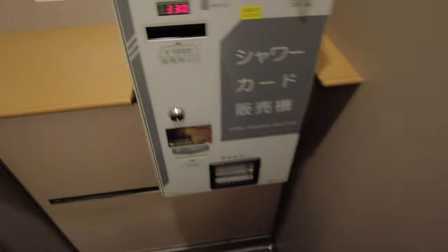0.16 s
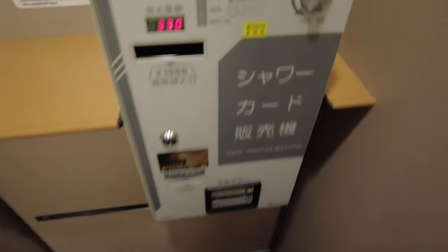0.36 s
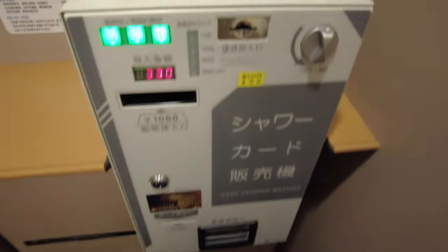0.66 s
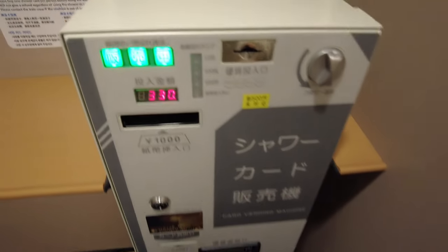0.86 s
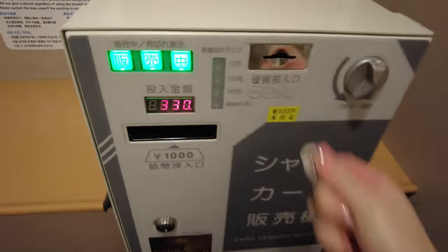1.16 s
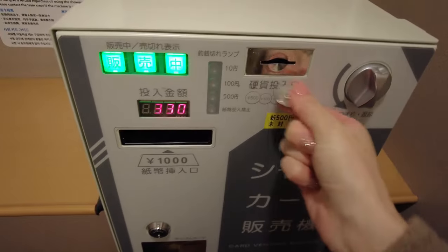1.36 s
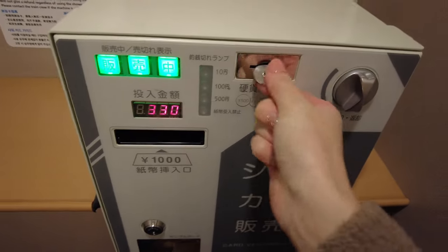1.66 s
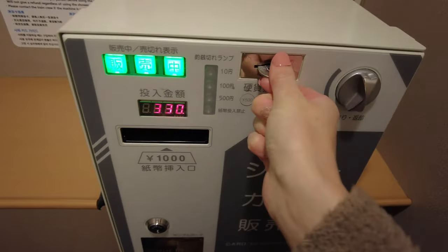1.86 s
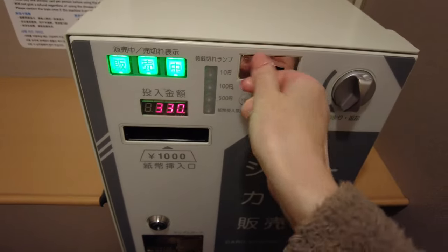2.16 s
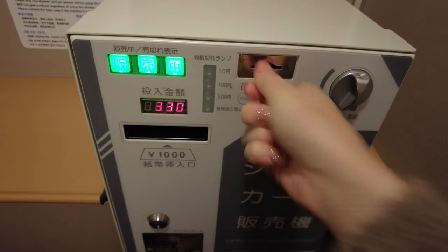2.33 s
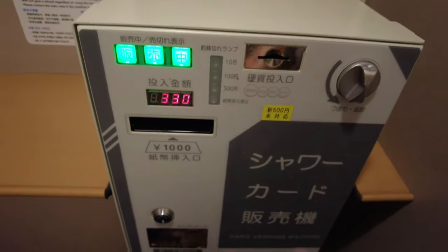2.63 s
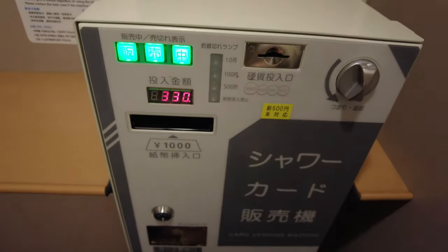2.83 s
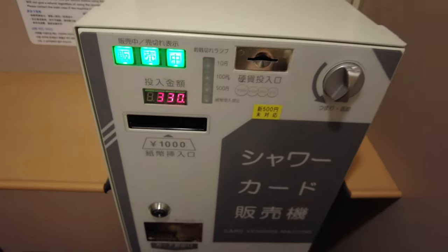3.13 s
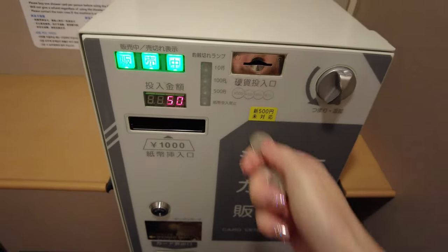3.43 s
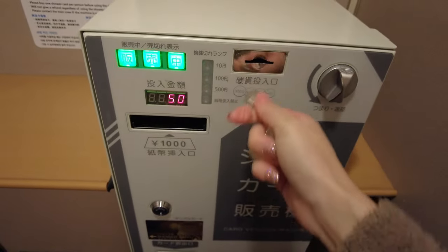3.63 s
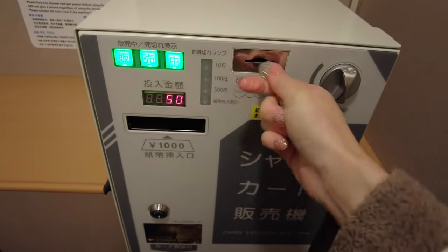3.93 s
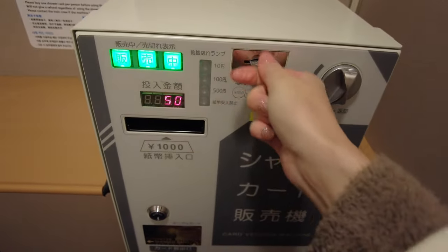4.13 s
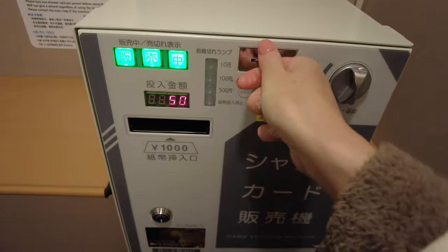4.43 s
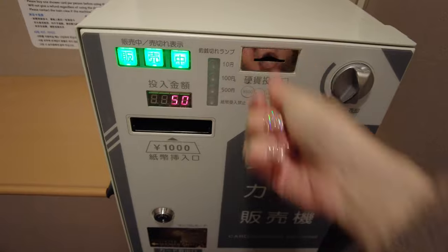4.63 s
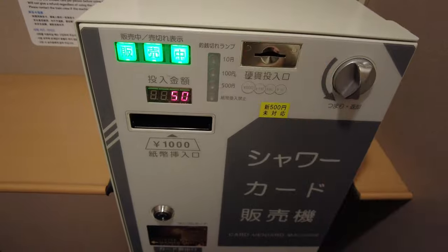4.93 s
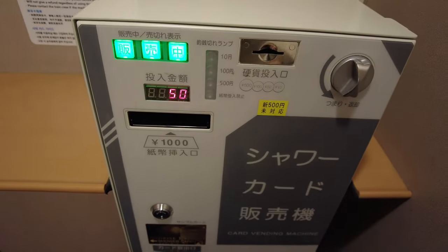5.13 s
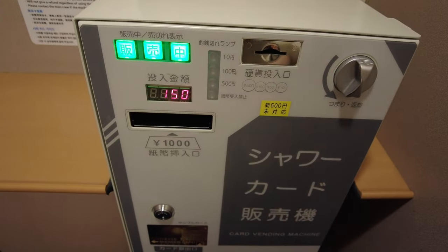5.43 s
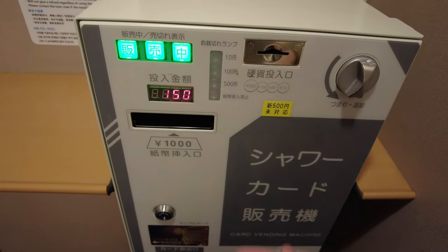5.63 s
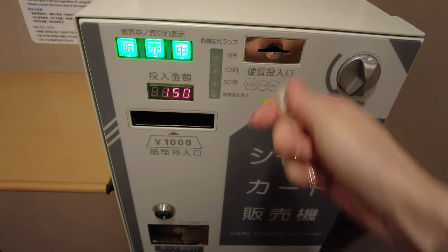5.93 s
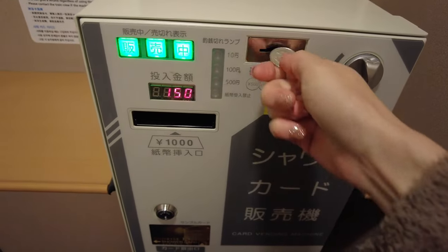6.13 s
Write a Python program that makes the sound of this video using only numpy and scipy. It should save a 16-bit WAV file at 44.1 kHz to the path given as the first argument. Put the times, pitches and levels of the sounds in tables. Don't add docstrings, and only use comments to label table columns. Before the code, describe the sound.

Coins tick into the metal slot of a vending machine, ring briefly and rattle down inside, over a train carriage's steady low rumble.

```python
import sys
import numpy as np
from scipy import signal
from scipy.fft import rfft, irfft
from scipy.io import wavfile
from scipy.ndimage import uniform_filter1d

SR = 44100
rng = np.random.default_rng(int(sys.argv[2]) if len(sys.argv) > 2 else 0)


def gain_from_db(level_db):
    decades = np.asarray(level_db, float) / 20
    return 10 ** decades


def pcm_store(signal):
    levels = np.round(np.clip(np.atleast_2d(signal), -1, 1) * 32767)
    wavfile.write(sys.argv[1], SR, levels.astype(np.int16).T)


N = 277389


def evened(x):
    return x / np.sqrt(np.mean(x ** 2) + 1e-20)


def read(points, hz):
    f, value = np.transpose(points)
    return np.interp(np.log(hz + 1), np.log(f + 1), value)


def curve(rows):
    start_s, level_db = np.transpose(rows)
    return np.interp(np.arange(N) / SR, start_s, level_db)


def bumps(hz, modes):
    return sum(db / (1 + (2 * (hz - f) / w) ** 2) for f, w, db in modes)


def add(mix, start_s, sound):
    part = mix[:, round(start_s * SR):][:, :sound.shape[-1]]
    part += sound[..., :part.shape[1]]


# pitch_hz, likeness [-1..1]
FAR_LIKENESS = [(25, 0.95), (60, 1), (150, 0.98), (300, 0.85), (600, 0.17), (1200, 0.47), (3000, 0.26),
                (8000, 0), (14000, 0)]
# pitch_hz, likeness [-1..1]
NEAR_LIKENESS = [(1000, 0.5), (3000, 0.22), (6000, 0.22), (10000, 0.26), (14000, -0.23)]
# pitch_hz, level_db
LEAN = [(60, -1.4), (150, 0.5), (380, 1), (950, 3.5), (2380, -0.5), (5980, 1), (15000, -0.5)]


def pair(a, b, shape_db, likeness=FAR_LIKENESS):
    size = a.shape[-1]
    hz = np.fft.rfftfreq(size, 1 / SR)
    same = np.clip(read(likeness, hz), -1, 1)
    lean = gain_from_db(read(LEAN, hz) / 2)
    a, b = rfft(a), rfft(b)
    left = a * lean
    right = (same * a + np.sqrt(1 - same ** 2) * b) / lean
    return evened(irfft(np.array([left, right]) * gain_from_db(shape_db(hz)), size))


# start_s, level_db
SHAKING = [(0.0, -33), (0.52, -27.5), (0.75, -35), (1.1, -27), (1.95, -26.5), (2.07, -31), (2.3, -27),
           (2.7, -28), (3.0, -29), (3.28, -26), (3.62, -32), (3.9, -29), (4.5, -26.5), (5.2, -28),
           (5.6, -27), (6.29, -29)]
# pitch_hz, level_db_per_hz
SWAY = [(6, -47), (14, -13), (25, 19.5), (48, 24), (65, 17), (85, -46)]
# pitch_hz, level_db_per_hz
WHEEL_ROLL = [(50, -7), (70, 5.5), (90, 5.5), (115, 1.5), (135, -14), (170, -63.5)]
# pitch_hz, level_db_per_hz
AIR = [(90, -35), (130, -3), (187, -6.5), (279, -12.5), (322, -9.5), (522, -18.5), (780, -21.5),
       (1010, -36), (1290, -37.5), (1600, -33), (2770, -40.5), (5000, -46), (9000, -60), (16000, -80)]
# pitch_hz, width_hz, level_db
DUCTS = [(181, 10, 5.5), (378, 150, -1.5), (322, 25, 3), (354, 14, 6), (398, 16, 6), (492, 22, 8),
         (776, 22, 8), (1330, 164, 13), (2888, 760, 7), (2600, 70, 5), (4450, 250, 6)]


def train():
    noise = rng.standard_normal((6, N))
    usual_db = -28
    excess_db = curve(SHAKING) - usual_db
    sway = gain_from_db(-29.5 + 0.7 * excess_db) * pair(*noise[:2], lambda hz: read(SWAY, hz))
    roll = gain_from_db(-31.5 + 1.3 * excess_db) * pair(*noise[2:4], lambda hz: read(WHEEL_ROLL, hz))
    air = gain_from_db(-42.5) * pair(*noise[4:], lambda hz: read(AIR, hz) + bumps(hz, DUCTS))
    return sway + roll + air


# start_s, level_db
RATTLE_MOTION = [(0.0, -62.5), (0.8, -66), (1.2, -84), (1.75, -72), (2.01, -60), (2.5, -56), (2.73, -54.5),
                 (2.98, -59.5), (3.12, -45.5), (3.24, -52.5), (3.36, -58), (3.52, -60), (3.73, -73),
                 (4.43, -63), (4.66, -56), (4.82, -60.5), (5.02, -58), (5.2, -51), (5.4, -51), (5.56, -55),
                 (5.62, -50), (5.7, -51.5), (5.74, -58), (5.81, -58), (5.85, -51), (5.9, -54), (6.1, -64)]
# pitch_hz, level_db_per_hz
RATTLE_SPECTRUM = [(1180, 25), (2000, 0), (2960, 6), (4230, 11), (4940, 5.5), (11600, -2), (15100, -3),
                   (16000, -10)]
# pitch_hz, level_db_per_hz
CABINET = [(200, -32), (450, 3), (800, 11), (1400, 9), (2500, 1), (5000, -40)]
# middle_s, half_length_s, level_db
SHAKES = [
    (0.47, .2, -53),
    (2.5, .2, -51.5),
    (3.2, .3, -47.5),
    (4.7, .4, -52.5),
    (5.35, .3, -50),
    (5.68, .2, -44),
    (6.2, .3, -56),
]


def rattle():
    clicks_per_s, tail_s, still_db = 200, 0.0089, -61.5
    clicks = gain_from_db(2.27 * rng.exponential(1, N)) * (rng.random(N) < clicks_per_s / SR)
    tail = np.exp(-np.arange(2000) / (tail_s * SR))
    grain = evened(np.sqrt(abs(signal.oaconvolve(clicks ** 2, tail)[:N])))
    noise = rng.standard_normal((4, N))
    metal = pair(*noise[:2], lambda hz: read([(1200, -30)] + RATTLE_SPECTRUM, hz), NEAR_LIKENESS)
    bright = evened((0.37 + grain) * metal)
    boom = evened((2.8 + grain) * pair(*noise[2:], lambda hz: read(CABINET, hz)))
    t = np.arange(N) / SR
    shake = gain_from_db(still_db) + sum(gain_from_db(db) * np.exp(-((t - s) / half_s) ** 2) for s, half_s, db in SHAKES)
    return gain_from_db(curve(RATTLE_MOTION) - 3) * bright + gain_from_db(-5.5) * shake * boom


# pitch_hz, width_hz, level_db
CHUTE = [(1274, 360, 5.5), (1887, 390, 5.5), (2580, 140, 7), (4350, 200, 5), (4760, 100, 4), (6140, 230, 2),
         (7190, 320, 0), (8700, 270, -2)]
# pitch_hz, width_hz, level_db
COIN_FACE = [(5500, 350, 7), (6850, 350, 8), (8500, 400, 7), (9500, 350, 8), (10700, 400, 6),
             (11700, 400, 6), (13800, 600, 5)]


def uneven(modes, reach):
    return [(f, w, db * k) for (f, w, db), k in zip(modes, reach)]


def ticks(rows, ring_hz, t60_s, rise_s, crack, trim_db):
    out = np.zeros((2, N))
    t = np.arange(8192) / SR
    fade = np.hanning(2 * len(t))[len(t):]
    for start_s, blow_db, bass_db, treble_db in rows:
        steps = [(300, bass_db - 14), (900, bass_db + 9.5), (2000, bass_db + 7.5), (3500, 0.89),
                 (6500, 0.07), (10000, treble_db + 10), (15000, treble_db + 9.5)]
        modes = uneven(CHUTE, 0.58 + 0.89 * rng.random(len(CHUTE)))
        modes += [(ring_hz, 0.077 * ring_hz, 7)]
        modes += uneven(COIN_FACE, 1.1 * rng.random(len(COIN_FACE)))
        noise = rng.standard_normal((2, len(t)))
        burst = pair(*noise, lambda hz: read(steps, hz) + bumps(hz, modes), NEAR_LIKENESS)
        snap = crack * (np.exp(-t / 0.00094) + 0.8 * np.exp(-t / 0.006))
        body = 0.85 * gain_from_db(-60 * (t / t60_s) ** 1.094)
        corridor = 0.06 * gain_from_db(-60 * t / 1.2)
        shape = (1 - np.exp(-t / rise_s)) * (snap + body + corridor)
        chatter_db = 2.31 * evened(uniform_filter1d(rng.standard_normal(len(t)), size=90))
        add(out, start_s, gain_from_db(blow_db + trim_db + chatter_db) * burst * shape * fade)
    return out


def strike(mix, start_s, level_db, pitch_hz, t60_s, rise_s, stop_s=N / SR):
    t = np.arange(round(min(t60_s, 0.4) * SR)) / SR
    lead_rad = 0.6 * np.tanh(pitch_hz / 2500)
    phase = np.array([[lead_rad], [-lead_rad]])
    decay = gain_from_db(-60 * t / t60_s) * (1 - np.exp(-t / rise_s))
    sound = decay * np.sin(2 * np.pi * pitch_hz * t + phase)
    slow = uniform_filter1d(rng.standard_normal((2, SR // 2)), size=200)
    flutter = evened(uniform_filter1d(slow, size=140))[:, :len(t)]
    flutter_db = 4 * np.tanh(pitch_hz / 2000) * flutter
    damped_db = -1500 * np.maximum(start_s + t - stop_s, 0)
    add(mix, start_s, gain_from_db(level_db + damped_db + flutter_db) * sound)


def strikes(rows, trim_db, t60_s, rise_s):
    out = np.zeros((2, N))
    for start_s, level_db, pitch_hz in rows:
        strike(out, start_s, level_db + trim_db, pitch_hz, t60_s, rise_s)
    return out


# start_s, blow_db, bass_db, treble_db
SLOT_TICKS = [(0.296, -28.5, -4, -22), (0.3454, -42.5, -13, -10), (0.8609, -46.5, -11, -14),
              (1.3925, -23, -3, -31), (1.7714, -41.0, -6, -24), (2.0198, -34.5, -10, -17),
              (2.2778, -37.0, -2, -10), (2.3216, -28.0, -2, 2), (2.7944, -43.0, -12, -4),
              (3.9806, -23.5, -10, -14), (4.1135, -33.0, -11, -21), (4.4643, -24.5, -15, -9)]
# ring_hz, t60_s, rise_s, crack_share, trim_db
SLOT = (2750, .11, .0004, .57, -12.5)


def slot_ticks():
    return ticks(SLOT_TICKS, *SLOT)


# start_s, level_db, pitch_hz
EDGE_RINGS = [(0.2962, -42, 6750), (1.6556, -32, 6960), (2.2787, -42, 6830), (2.323, -23.5, 9420),
              (2.4683, -44, 6530), (2.6284, -34, 9840), (2.7476, -34, 7300), (2.929, -31, 5600),
              (2.9462, -33, 5600), (3.203, -35, 7200), (2.542, -33, 6500), (2.9814, -37, 9110),
              (3.9803, -26, 6960), (4.0044, -33, 6760), (4.1128, -34.5, 6890), (4.4982, -32, 6760),
              (4.6778, -45, 6300), (4.6982, -35, 6480), (6.2412, -40, 7740)]


def edge_rings():
    return strikes(EDGE_RINGS, -8.5, t60_s=0.05, rise_s=0.001)


# start_s, level_db, pitch_hz
PANEL_RINGS = [(0.297, -29.5, 814), (0.951, -41, 760), (1.391, -26.5, 1110), (1.41, -35, 1900),
               (2.469, -39, 820), (2.486, -35, 759), (2.541, -40, 1330), (2.981, -39, 1340),
               (3.112, -32.5, 777), (3.453, -39, 1024), (3.981, -32, 1930), (4.005, -34, 1910),
               (4.114, -37, 1910), (4.677, -40, 1500), (5.103, -37, 1940), (5.175, -39, 790),
               (5.425, -41, 765), (5.482, -31, 1108), (5.62, -31, 762), (5.772, -33, 756),
               (6.242, -41, 1950)]


def panel_rings():
    return strikes(PANEL_RINGS, -8.5, t60_s=0.11, rise_s=0.001)


# start_s, level_db, pitch_hz
KNOCKS = [
    (0.297, -38, 396),
    (1.124, -33, 343),
    (1.579, -33.5, 403),
    (5.582, -34, 692),
    (5.629, -32, 394),
    (5.78, -40, 630),
    (5.849, -34, 507),
    (5.879, -33, 486),
]


def box_knocks():
    return strikes(KNOCKS, 0, t60_s=0.1, rise_s=0.004)


# start_s, level_db, pitch_hz
THUDS = [
    (0.393, -25, 209),
    (0.528, -12, 184.2),
    (1.113, -23, 242),
    (1.51, -26, 320),
    (1.944, -22, 190),
    (2.3, -27.5, 317),
    (5.588, -27, 222),
    (5.822, -31, 261),
]


def carriage_thuds():
    return strikes(THUDS, -4, t60_s=0.22, rise_s=0.012)


# start_s, blow_db, bass_db, treble_db
WALL_BOUNCES = [(0.398, -41, -5, -31), (1.712, -43.5, -6, -22), (1.9194, -48.0, 8, -17),
                (2.2534, -46.0, -7, -15), (2.3394, -34.5, -8, -4), (2.359, -34.0, -13, -18),
                (3.055, -35.0, -18, -16), (3.0655, -35.0, -16, -18), (4.0045, -31.5, -10, -23),
                (4.1291, -44.0, 3, -19), (4.2032, -43, -1, -16), (4.2394, -47, -3, -11),
                (4.7606, -38, -17, -18), (5.4226, -37.5, 18, -18), (5.6667, -42, -21, -18),
                (5.8284, -33, 4, -3), (5.8455, -34.0, -12, -12), (6.0035, -45.5, 0, -10),
                (6.2806, -39.0, -5, -16)]
# ring_hz, t60_s, rise_s, crack_share, trim_db
WALL = (2700, .12, .0037, .3, -5.5)


def wall_bounces():
    return ticks(WALL_BOUNCES, *WALL)


# start_s, level_db, pitch_hz
CLINKS = [(2.9293, -39, 7600), (2.9462, -38, 7800), (2.958, -37, 4700), (2.992, -35, 4500),
          (3.0126, -34, 4300), (3.055, -38, 2490), (3.055, -38, 4800), (3.067, -35, 3200),
          (3.069, -36, 4400), (3.106, -37, 4500), (3.131, -35, 4500), (3.138, -41, 5300),
          (3.165, -39, 4400), (3.217, -37, 7600), (3.244, -39, 4500), (2.469, -35, 2510),
          (2.487, -36, 4070), (2.542, -35, 3500), (2.5857, -37, 4770), (2.608, -38, 4500),
          (2.608, -39, 6300), (2.6286, -33, 4900), (4.508, -40, 3550), (4.679, -37, 3750),
          (4.679, -37, 4600), (4.7, -35, 4200), (4.699, -36, 5900), (5.474, -37, 2500), (5.49, -36, 5400),
          (5.674, -36, 2800), (5.772, -42, 4300), (5.774, -41, 3150), (0.398, -40, 2700),
          (5.057, -35, 4200), (5.071, -34, 4200), (5.074, -36, 5500), (5.105, -36, 4250),
          (5.152, -36, 4300), (4.802, -35, 4800), (2.63, -33, 4200)]


def clinks():
    return strikes(CLINKS, -8.5, t60_s=0.04, rise_s=0.001)


# start_s, level_db, pitch_hz
GATE_RINGS = [
    (0.401, -41, 3030),
    (1.6571, -35, 2580),
    (2.6305, -34, 4600),
    (2.981, -28, 4400),
    (3.1124, -34, 4200),
    (3.9809, -31, 2800),
    (4.1135, -33, 2800),
    (4.6786, -34, 2510),
    (5.4745, -30, 4400),
    (6.2407, -39, 3650),
]


def gate_rings():
    return strikes(GATE_RINGS, -8.5, t60_s=0.07, rise_s=0.001)


# start_s, blow_db, bass_db, treble_db
SKIDS = [
    (0.7068, -47.0, -14, -16),
    (2.9459, -31.0, -27, -15),
    (4.4982, -31.5, -13, -8),
    (5.1038, -31.5, -7, -29),
]
# ring_hz, t60_s, rise_s, crack_share, trim_db
SKID = (4200, .3, .0004, .57, -12.5)


def skids():
    return ticks(SKIDS, *SKID)


# start_s, blow_db, bass_db, treble_db
COIN_TICKS = [
    (0.7561, -33.5, -12, -6),
    (1.6571, -26.5, -14, -17),
    (2.0948, -33.0, -12, -17),
    (2.177, -31.0, -9, -4),
    (2.5411, -24.5, -13, -14),
    (4.311, -34, -18, -8),
    (4.359, -38.0, -6, -4),
    (4.9673, -35.5, -33, -17),
]
# ring_hz, t60_s, rise_s, crack_share, trim_db
COIN = (6500, .08, .0004, .57, -12.5)


def coin_ticks():
    return ticks(COIN_TICKS, *COIN)


# start_s, blow_db, bass_db, treble_db
SORTER_BOUNCES = [(0.7785, -39.5, -6, -15), (2.61, -39.0, -13, -20), (2.7314, -37, -30, -5),
                  (2.748, -43.0, -30, -6), (3.1133, -32.0, -7, -18), (3.134, -45.5, -14, -16),
                  (3.2389, -36.0, -3, -7), (3.4535, -34.0, -7, -17), (5.056, -30, -11, -14),
                  (5.1494, -34, -7, -14), (5.17, -35.5, -6, -14), (5.4884, -29.0, -8, -14),
                  (5.7705, -42.0, 1, -20)]
# ring_hz, t60_s, rise_s, crack_share, trim_db
SORTER = (4250, .095, .0037, .3, -5)


def sorter_bounces():
    return ticks(SORTER_BOUNCES, *SORTER)


# start_s, blow_db, bass_db, treble_db
GATE_TICKS = [(0.9499, -33.5, 2, -37), (2.4688, -28.0, -9, -23), (2.4861, -27.5, -14, -13),
              (2.6282, -23.0, -20, -11), (2.981, -27.5, -10, -13), (4.2965, -41.0, -8, -7),
              (4.569, -37, -18, -49), (4.697, -29.0, -10, -11), (4.801, -28, -19, -10),
              (5.474, -26.5, -8, -23), (6.24, -30.0, -5, -10)]
# ring_hz, t60_s, rise_s, crack_share, trim_db
GATE = (4200, .09, .0004, .57, -12.5)


def gate_ticks():
    return ticks(GATE_TICKS, *GATE)


# start_s, blow_db, bass_db, treble_db
SNAPS = [
    (2.9285, -33, -30, -17),
    (4.6776, -27, -7, -24),
    (3.126, -33, -8, -16),
    (3.141, -36, -10, -18),
    (2.962, -35, -20, -16),
    (3.0685, -30, -8, -12),
    (1.593, -46, -20, -10),
    (1.085, -48, -20, -8),
]
# ring_hz, t60_s, rise_s, crack_share, trim_db
SNAP = (5600, .035, .0004, .5, -12)


def snaps():
    return ticks(SNAPS, *SNAP)


# start_s, level_db, t60_s
THUMPS = [
    (1.111, -37, 0.11),
    (1.507, -36.5, 0.11),
    (3.124, -37.5, 0.15),
    (5.422, -36, 0.1),
    (5.589, -28, 0.25),
    (5.774, -37, 0.1),
    (5.821, -29, 0.23),
]


def thumps():
    out = np.zeros((2, N))
    t = np.arange(8192) / SR
    top_hz = 900
    steps = [(120, -25), (220, 0), (top_hz, -8), (2 * top_hz, -26), (5 * top_hz, -80)]
    for start_s, level_db, t60_s in THUMPS:
        puff = pair(*rng.standard_normal((2, len(t))), lambda hz: read(steps, hz), NEAR_LIKENESS)
        add(out, start_s, gain_from_db(level_db - 5 - 60 * t / t60_s) * (1 - np.exp(-t / 0.0034)) * puff)
    return out


# start_s, level_db, pitch_hz
FLAPS = [(3.067, -35, 1010), (3.124, -33, 1000), (3.137, -35, 1100), (5.394, -38, 1300), (5.422, -31, 1250),
         (5.437, -32, 1350), (5.505, -36, 1300), (5.62, -33, 1400), (5.634, -36, 1300), (5.773, -32, 1400),
         (5.78, -36, 900), (5.825, -34, 1000), (5.838, -35, 1400), (5.85, -36, 1700), (1.425, -40, 1950),
         (1.58, -40, 900)]


def flap_taps():
    return strikes(FLAPS, -8.5, t60_s=0.07, rise_s=0.001)


# start_s, level_db, pitch_hz, t60_s
COIN_RINGS = [
    (2.176, -42, 10900, 0.25),
    (2.2797, -45, 11700, 0.33),
    (2.5421, -27, 11600, 0.16),
    (4.699, -33, 10900, 0.3),
    (5.2794, -71.5, 13000, 0.3),
]


def coin_rings():
    out = np.zeros((2, N))
    for start_s, level_db, pitch_hz, t60_s in COIN_RINGS:
        strike(out, start_s, level_db - 19.5, pitch_hz, t60_s, rise_s=0.0015)
    return out


# start_s, blow_db, upper_modes_db
PLATE_HITS = [
    [(2.3228, -28.5, -2), (2.3414, -32, 1), (2.358, -27, 2), (2.3844, -38, 6), (2.4104, -40, 8),
     (2.446, -44, 1)],
    [(4.4629, -24, 0)],
    [(4.568, -30, -1)],
]
# pitch_hz, level_db, t60_s
PLATE_MODES = [
    [(2990, 1, 0.2), (3040, -3.5, 0.2), (3180, -8, 0.3), (3967, -12, 0.15), (4500, -20, .1),
     (4840, -6.5, 0.21), (4900, -7, 0.3), (8600, -19, 0.12), (9420, -16, .14), (11620, -24, .1),
     (14780, -17, .1)],
    [(3025, -1.5, 0.3), (3065, -11, 0.3), (3919, -11, 0.16), (2590, -22, .3), (4830, -1, 0.08),
     (4850, -20, .5), (8700, -13, .1), (9300, -16, .2), (10460, -12, .11), (10930, -21, .15)],
    [(3004, -2, .08), (3025, -17, .5), (3182, -9, .2), (2600, -15, .5), (3941, -4, .1), (4800, -3, .08),
     (4867, -11, .6)],
]
PLATE_DAMPED_S = [2.475, 4.575, 4.68]


def plate_rings():
    out = np.zeros((2, N))
    for hits, plate, last_stop_s in zip(PLATE_HITS, PLATE_MODES, PLATE_DAMPED_S):
        stops_s = [hit[0] for hit in hits[1:]] + [last_stop_s]
        for (start_s, blow_db, upper_db), stop_s in zip(hits, stops_s):
            for pitch_hz, mode_db, t60_s in plate:
                level_db = blow_db + mode_db - 10.5
                if 3500 <= pitch_hz < 7000:
                    level_db += upper_db
                strike(out, start_s, level_db, pitch_hz, t60_s, 0.0006, stop_s)
    return out


# start_s, blow_db, bass_db, treble_db
ROLLS = [
    (3.0118, -37.0, -8, -22),
    (3.2008, -41.5, -11, -16),
    (3.4238, -37.5, -5, -10),
    (5.016, -43.5, -25, -17),
    (5.0727, -36, -13, -12),
    (5.588, -40.0, -10, -14),
    (5.8874, -42.0, -6, -10),
]
# ring_hz, t60_s, rise_s, crack_share, trim_db
ROLLING = (4000, .29, .0037, .2, -5.5)


def rolls():
    return ticks(ROLLS, *ROLLING)


def scene():
    sources = [train, rattle, slot_ticks, edge_rings, panel_rings, box_knocks, carriage_thuds,
               wall_bounces, clinks, gate_rings, skids, coin_ticks, sorter_bounces, gate_ticks,
               snaps, thumps, flap_taps, coin_rings, plate_rings, rolls]
    return sum(source() for source in sources)


def top_cut(x):
    return signal.sosfilt(signal.butter(12, 15900, fs=SR, output="sos"), x)


def record(dry):
    edge = signal.firwin(511, 15850, window=("kaiser", 9), fs=SR)
    mix = signal.oaconvolve(dry, edge[None], "same", axes=1)
    return top_cut(mix)


dry = scene()
out = record(dry)
pcm_store(out)
```